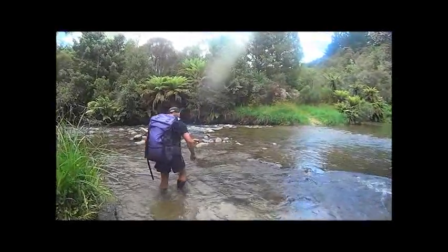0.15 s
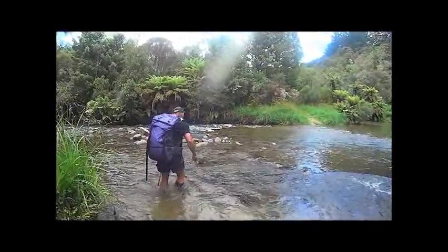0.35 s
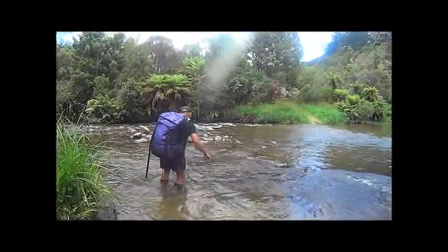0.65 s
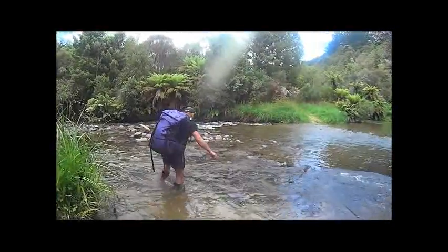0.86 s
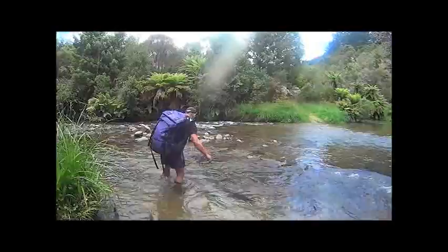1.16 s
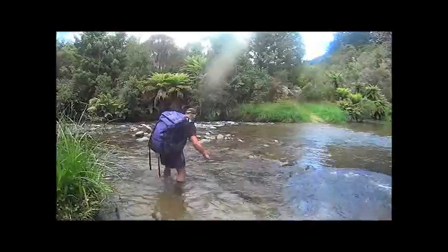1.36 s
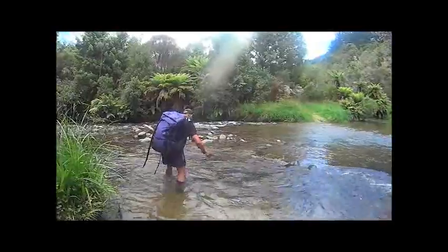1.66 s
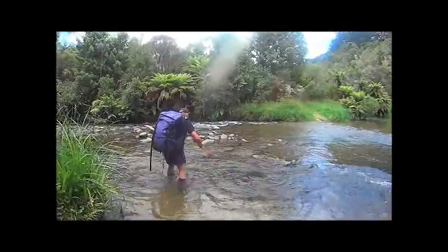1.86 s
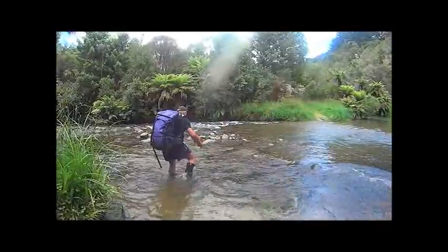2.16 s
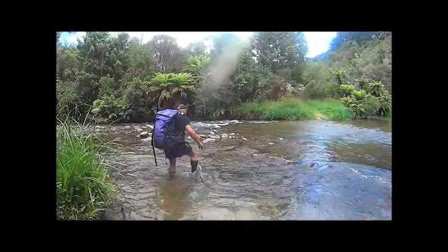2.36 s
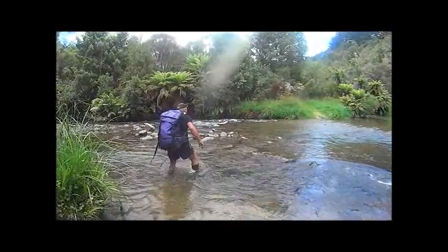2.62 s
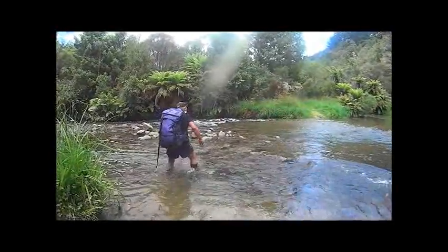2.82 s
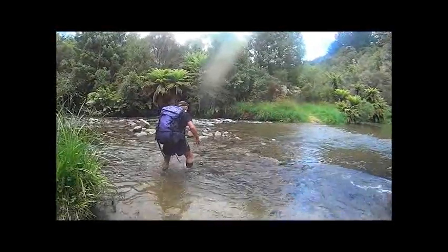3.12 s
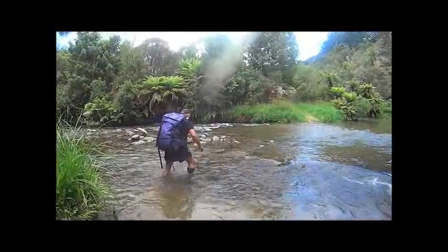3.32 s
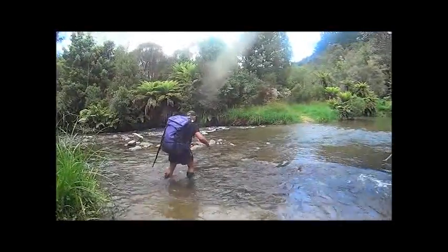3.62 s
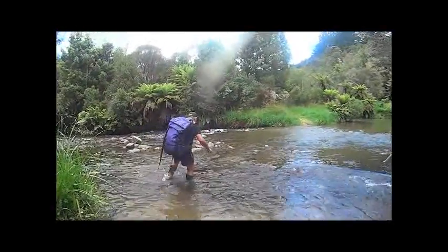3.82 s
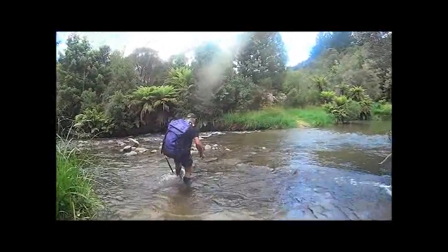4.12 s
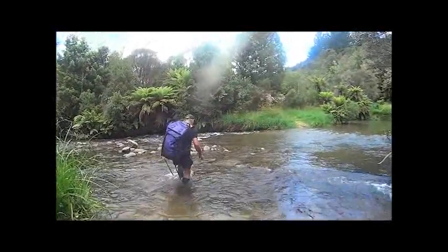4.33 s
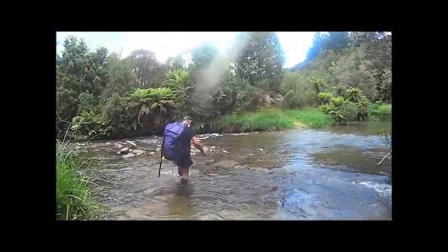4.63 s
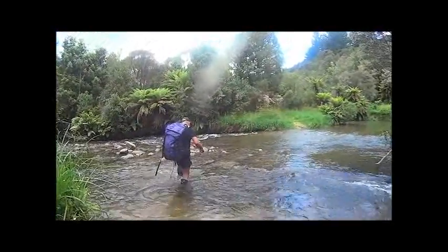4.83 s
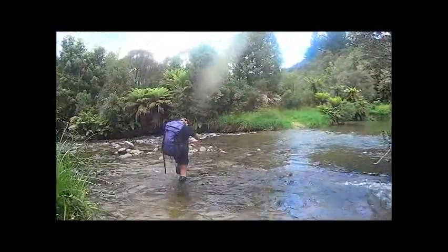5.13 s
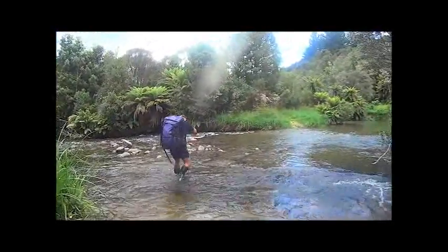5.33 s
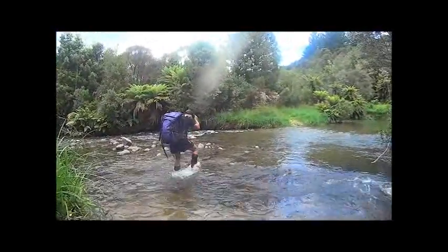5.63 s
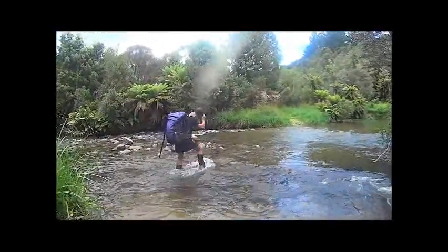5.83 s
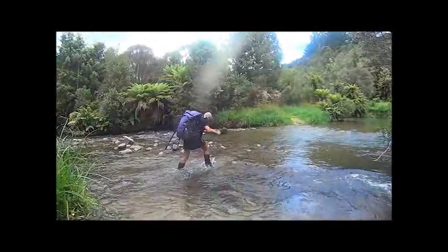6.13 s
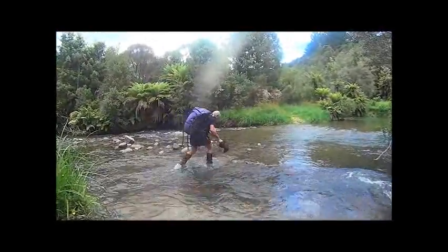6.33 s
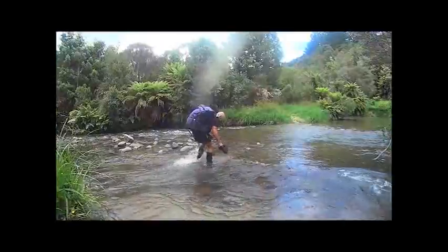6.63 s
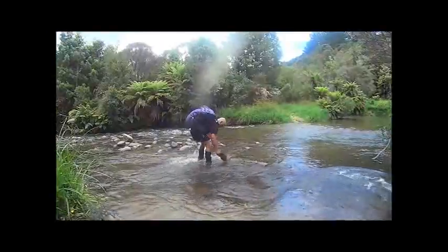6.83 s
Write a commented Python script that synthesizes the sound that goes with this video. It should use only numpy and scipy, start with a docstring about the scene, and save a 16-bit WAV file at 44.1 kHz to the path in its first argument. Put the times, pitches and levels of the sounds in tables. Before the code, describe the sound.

Steady muffled babbling water with a nasal ring, fingers scraping and clacking the camera housing partway through, then faint low wading gurgles.

```python
"""A shallow stream over stones in a forest, on two microphones inside the waterproof housing of a small camera.
Throughout, a far riffle's wash and near bubbles ring the housing's modes and seep through its walls; the babble
swells briefly here and there, and the hand rumbles softly. About 3 s in, the hand grips: fingers scrape and blows
ring the shell. The knocks reseat the case, so the water then rings slightly different modes, louder until it settles.
In the last third a wader's strides add brief low gurgles."""
import sys
import numpy as np
from scipy.fft import rfft, irfft, next_fast_len
from scipy.io import wavfile

SR = 44100
rng = np.random.default_rng(int(sys.argv[2]) if len(sys.argv) > 2 else 0)


def bounce(signal):
    """Save signal as a 16-bit WAV file at the path given by the first command-line argument."""
    frames = np.transpose(np.atleast_2d(signal))
    limited = np.clip(frames, -1, 1)
    pcm = np.round(limited * 32767).astype(np.int16)
    wavfile.write(sys.argv[1], SR, pcm)


N = 307377
T = np.arange(N) / SR  # seconds
SIZE = next_fast_len(N + SR // 2)  # transform length, with room for ringing
HZ = np.maximum(np.arange(SIZE // 2 + 1) * SR / SIZE, 1e-3)  # never 0, for the logarithms

# Housing modes rung by the water; levels relative, before and after the knocks:
# pitch_hz, width_hz, before_db, after_db, left_minus_right_db, phase_between_microphones_rad
HOUSING_MODES = [(151, 320, -28, -28.5, 0.5, 0), (434, 127, -31, -29.5, -4, -1.6),
                 (652, 193, -26, -23.5, 0, -0.9), (1170, 134, -24.5, -23, 3.5, -0.1),
                 (1589.3, 211, -0.6, -2.5, 2, 0.36), (2200, 310, -21.5, -26.5, 3, 0.3),
                 (2620, 510, -18, -17.5, -0.1, 3.0), (2927, 260, -27.5, -18, 5, 3),
                 (3177, 360, -20.5, -18, -1, 1.59), (3560, 520, -25.5, -27, 1.5, 2.27),
                 (4300, 350, -23.5, -25.5, 1.5, 1.8), (5170, 740, -27, -28, 1, -0.5),
                 (7350, 650, -38.5, -33.5, 4.5, 1), (9960, 2100, -40.5, -41.5, 0, -6)]
# Colour of the sound through the walls, unrelated at the two microphones: pitch_hz, relative_level_db (per Hz)
WALL_SEEP = [(40, -16), (150, -9), (270, -1.5), (450, -1.5), (750, .5), (1050, -0.5), (2000, -3),
             (2700, -6.5), (3800, -9.5), (4500, -7), (5300, -8.5), (6300, -10.5), (8500, -12.5),
             (11000, -20)]
# Brief swells of the babble near the main housing resonance: start_s, peak_db (before panning)
SWELL_EVENTS = [(1.475, -39), (2.53, -35), (4.045, -35), (5.461, -39), (6.543, -37.5)]
# Blows on the housing, levels before the shell's antiresonance:
# start_s, click_db, scrape_db, scrape_decay_s, thud_db, hardness_db_per_octave
BLOWS = [(3.050, -52, -39, 0.0067, -68, .3), (3.09, -53, -36, 0.0048, -62, 0),
         (3.096, -49, -32, 0.0038, -53, .3), (3.1126, -44, -26.5, 0.0023, -58, 0.3),
         (3.1414, -18, -25.5, 0.0028, -35, -0.5), (3.226, -32, -35.5, 0.009, -40.5, -.5),
         (3.245, -30, -46.5, 0.017, -65, -1), (3.455, -31, -44, 0.0079, -62, -1.5),
         (3.4921, -23, -33.5, .012, -37, 0.9), (3.535, -21, -29, 0.0067, -37.5, -.7),
         (3.728, -24.5, -42.5, 0.018, -66, 0), (3.7426, -8.5, -33, 0.0026, -44, .6),
         (3.8112, -64, -54, .006, -76, 4.5), (3.931, -55, -54.5, .004, -51, -4.5)]
# Modes of the shell under the hand, levels relative, t60 undamped:
# pitch_hz, t60_s, struck_db, rubbed_db, left_minus_right_db, phase_between_microphones_rad
SHELL_MODES = [(111, 0.01, -40, -5.5, 0, 0), (244, 0.019, -24, -5.5, 3, 0.6), (434, 0.029, -30, 2.5, 0, -2),
               (562, 0.031, -11.5, 3, 1.5, 0.13), (664, 0.23, -27, -29, -7, -2),
               (1250, 0.018, -49, -3.5, -6, 1.4), (1517, 0.023, -2, 4.5, -5, -0.5),
               (1690, 0.01, -8.5, -13, 21, -2), (2290, 0.017, -10.5, -0.5, 0, 1.5),
               (3024, 0.01, -11.5, -5.5, 4.5, 1.34), (3480, 0.03, -29.5, -10, 7, -1),
               (4400, 0.0087, -18.5, -10.5, -3, 0.8), (5060, 0.0068, -36, -7.5, 2, 0.73),
               (6600, 0.0093, -28, -15.5, -1, 4.5), (7720, 0.0088, -20.5, -24, 5, -7.5),
               (9180, 0.003, -16.5, -20.5, -2, 2)]
# Fingers sliding on the housing; the last row is a faint hiss leading into the loudest late knock:
# start_s, length_s, level_db, hardness_db_per_octave
SLIDES_AND_HISS = [(3.043, 0.096, -56.5, 0), (3.148, 0.14, -48.5, 0.6), (3.482, 0.086, -42.5, 0.6),
                   (3.714, 0.031, -50, 2)]
# A wader's legs sloshing in the stream: centre_s, level_db, length_s (standard deviation)
STRIDES = [(4.44, -73, 0.032), (5.677, -61, 0.039), (6.514, -58.5, 0.028)]
# Soft bumps of the hand: start_s, peak_db, pitch_hz
HAND_BUMPS = [(.131, -59, 54.7), (.47, -55, 110), (0.671, -53, 48), (.839, -60, 60), (1.773, -50.5, 80),
              (1.88, -50.5, 105), (2.316, -55, 49.5), (3.49, -42, 85.4), (3.526, -45, 48), (3.99, -54, 60),
              (4.435, -54, 60), (4.87, -56, 110), (5.03, -52.5, 116), (5.73, -60, 44)]
# Colour of the hand's tremor: pitch_hz, relative_level_db (per Hz)
TREMOR_COLOUR = [(10, 1), (25, 8), (65, 2.5), (110, -5), (200, -16), (400, -25), (1000, -58)]

# The knocks reseat the case, gradually
RESEAT_START_S, RESEAT_LENGTH_S = 3.1, 0.5
# Jarred by the later knocks, the case rings a little louder until it settles
SETTLE_START_S, SETTLE_HOLD_S, SETTLE_ATTACK_S, SETTLE_RELEASE_S, SETTLE_DB = 3.48, 0.49, 0.12, 0.15, 1.6
# The longer a slide, the longer it takes to stop
SLIDE_ATTACK_S, SLIDE_RELEASE_SHARE = 0.0099, 0.21
# The hand takes hold once and slowly relaxes
GRIP_START_S, GRIP_HOLD_S, GRIP_ATTACK_S, GRIP_RELEASE_S = 2.99, 0.55, 0.035, 0.34
# Tremor at rest, what the grip adds to it, and how far both wander
TREMOR_DB, GRIP_DB, TREMOR_WANDER_DB = -74.5, -64.5, 1.5
TOP_HZ = 11050  # upper limit of the camera


def stream(ring_db=-26.0, seep_db=-49):
    """The water flows steadily, rings the housing and seeps through its walls."""
    near, *around = (water(bubble_db=-8, spread_db=1.8, flicker_db=.45, count=12000) for _ in range(3))
    jarred = gesture(SETTLE_START_S, SETTLE_HOLD_S, SETTLE_ATTACK_S, SETTLE_RELEASE_S)
    ringing = undb(ring_db + SETTLE_DB * jarred) * housing(near)
    seeping = undb(seep_db) * filtered(np.array(around), colour(WALL_SEEP))
    return ringing + seeping


def water(bubble_db, spread_db, flicker_db, cycles=14, count=7000):
    """An even wash from the far riffle plus nearby bubbles of every size, surging as the water tumbles."""
    wash = rng.standard_normal(N)
    bubbles = np.zeros(N)
    for when, pitch, size, length in rng.random((count, 4)):
        hz = 350 * 30 ** pitch  # 350 to 10500 Hz, even over the octaves
        size_db = -spread_db * np.log(max(size, .01))  # a few are much stronger
        add(bubbles, when * N / SR, undb(size_db) * hz * bubble(hz, cycles * (.5 + length)))
    surge_db = flicker_db * walk(35) + 0.38 * flicker_db * walk(7)
    return unit((wash + undb(bubble_db) * unit(bubbles)) * undb(surge_db))


def bubble(hz, cycles, rise=0.11):
    """A trapped air pocket rings and climbs in pitch as it nears the surface."""
    age = np.linspace(0, 1, int(cycles * SR / hz) + 2)  # share of its life
    turns = hz * T[:len(age)] * (1 + rise * age / 2)
    return np.sin(2 * np.pi * turns) * np.exp(-np.log(100) * age)


def housing(near, sag=0.01):
    """Each mode picks up its own part of the water; the knocks reseat the case, so modes sag and change strength."""
    before = after = 0
    for hz, width, before_db, after_db, pan_db, phase in HOUSING_MODES:
        drive = rfft(np.roll(near, rng.integers(N)), SIZE)
        before = before + resonance(hz, width, pan_db, phase) * (undb(before_db) * drive)
        after = after + resonance(hz * (1 - sag), width, pan_db, phase) * (undb(after_db) * drive)
    reseated = np.clip((T - RESEAT_START_S) / RESEAT_LENGTH_S, 0, 1)
    return (1 - reseated) * irfft(before, SIZE)[:, :N] + reseated * irfft(after, SIZE)[:, :N]


def babble_swells(hz=1560, swell_s=0.0023):
    """The babble swells briefly near the main housing resonance: tones that rise and fade within a few cycles."""
    out, age = np.zeros(N), T[:SR // 20]
    for (s, db), detune in zip(SWELL_EVENTS, rng.standard_normal(len(SWELL_EVENTS))):
        shape = age / swell_s * np.exp(1 - age / swell_s)
        add(out, s, undb(db) * shape * np.sin(2 * np.pi * hz * (1 + 0.029 * detune) * age))
    return pair(1.8, 0).real * out


def knocks(dead_hz=930, dead_width=420):
    """Each blow clicks the shell, jolts the camera and skids a little."""
    blows, friction = np.zeros((2, N)), np.zeros(N)
    for s, click_db, scrape_db, decay_s, thud_db, hardness in BLOWS:
        add(blows, s, undb(click_db) * click(hardness))
        add(blows, s, undb(thud_db) * thud(hz=166, decay_s=0.0025))
        add(friction, s, undb(scrape_db) * np.exp(-T[:SR // 4] / decay_s))
    # between its low and high modes the shell has an antiresonance, where a blow hardly gets through
    detune = (HZ / dead_hz - dead_hz / HZ) * dead_hz / dead_width
    antiresonance = 1j * detune / (1 + 1j * detune)
    return filtered(blows, antiresonance) + scrape(friction, held(BLOWS), grit_db=5)


def click(tilt_db):
    """One strike of the shell, peak 1; a harder contact favours the high modes."""
    age = T[:SR // 8]
    ring = 0
    for hz, t60, db, _, pan_db, phase in SHELL_MODES:
        gain = undb(db + tilt_db * np.log2(hz)) * pair(pan_db, phase)
        decaying_tone = np.exp((2j * np.pi * hz - np.log(1000) / t60) * age)
        ring = ring + (gain * decaying_tone).imag
    ring *= 1 - np.exp(-age / 0.00041)  # the contact takes a moment to build
    return ring / np.abs(ring).max()


def thud(hz, decay_s):
    """The whole camera jolts in a quickly damped swing, peak 1."""
    age = T[:SR // 8]
    swing = np.sin(2 * np.pi * hz * age) * np.exp(-age / decay_s)
    return swing / swing.max()


def slides_and_hiss():
    """Fingers slide grittily over the shell, and a faint hiss leads into the loudest late knock."""
    friction = 0
    for s, length_s, db, _ in SLIDES_AND_HISS:
        friction = friction + undb(db) * gesture(s, length_s, SLIDE_ATTACK_S, SLIDE_RELEASE_SHARE * length_s)
    return scrape(friction, held(SLIDES_AND_HISS), grit_db=5)


def scrape(friction, tilt_db, grit_db, damping=2.78):
    """Stick and slip make tiny uneven catches in the shell, whose modes the fingers damp and widen."""
    grit = np.repeat(rng.uniform(-1, 1, N // 48 + 1), 48)[:N]  # a new catch about every millisecond
    catches = friction * unit(undb(grit_db * grit))
    # tilt_db is per octave: a hard contact favours the high modes, a soft one the low
    out, power = 0, 0
    for hz, t60, _, db, pan_db, phase in SHELL_MODES:
        width = damping * np.log(1000) / (np.pi * t60)
        drive = undb(db + tilt_db * np.log2(hz / 1500)) * catches * rng.standard_normal(N)
        out = out + resonance(hz, width, pan_db, phase) * rfft(drive, SIZE)
        power += undb(db) ** 2 * width / (SR / 2)
    return irfft(out, SIZE)[:, :N] / np.sqrt(power)


def sloshes(hz=650, width=420):
    """Each stride stirs up a brief low gurgle of big bubbles."""
    stir = sum(undb(db) * np.exp(-.5 * ((T - s) / length_s) ** 2) for s, db, length_s in STRIDES)
    gurgle = water(bubble_db=6, spread_db=3, flicker_db=1)
    return stir * unit(filtered(gurgle, resonance(hz, width, 0, 0)))


def rumble(cycles=0.55):
    """The hand's tremor grows with its grip; tremor and soft bumps reach both microphones alike."""
    grip = gesture(GRIP_START_S, GRIP_HOLD_S, GRIP_ATTACK_S, GRIP_RELEASE_S)
    tremor = (undb(TREMOR_DB) + undb(GRIP_DB) * grip) * undb(TREMOR_WANDER_DB * walk(7))
    out = tremor * unit(filtered(rng.standard_normal(N), colour(TREMOR_COLOUR)))
    for s, db, hz in HAND_BUMPS:
        add(out, s, undb(db) * thud(hz, cycles / hz))
    return out


def resonance(hz, width, pan_db, phase):
    """Left and right response of one mode; some modes push the microphones in opposite directions."""
    detune = (HZ / hz - hz / HZ) * hz / width
    return pair(pan_db, phase) / (1 - detune ** 2 + 1j * np.sqrt(2) * detune)


def pair(pan_db, phase):
    """Complex gains with which one resonance reaches the left and right microphone."""
    sides = np.array([[.5], [-.5]])
    return undb(sides * pan_db) * np.exp(1j * sides * phase)


def gesture(start_s, hold_s, attack_s, release_s):
    """Envelope that rises, holds until hold_s after its start and dies away."""
    age = T - start_s
    return np.clip(age / attack_s, 0, 1) * np.exp(-np.maximum(age - hold_s, 0) / release_s)


def held(rows):
    """The last column of an event table, held from each event until the next."""
    table = np.array(rows)
    latest = np.maximum(np.searchsorted(table[:, 0], T) - 1, 0)
    return table[latest, -1]


def walk(rate):
    """Slow chance with a spread near 1, taking a new random value rate times a second."""
    knots = rng.standard_normal(1024)
    return 1.2 * np.interp(T * rate, np.arange(len(knots)), knots)


def colour(points):
    """Gain over frequency from (Hz, dB) points."""
    hz, db = np.transpose(points)
    return undb(np.interp(np.log(HZ), np.log(hz), db))


def filtered(x, response):
    """Pass x through a frequency response."""
    return irfft(rfft(x, SIZE) * response, SIZE)[..., :N]


def add(track, s, sound):
    """Mix a short sound into a track at time s."""
    start = int(s * SR)
    part = track[..., start:start + sound.shape[-1]]
    part += sound[..., :part.shape[-1]]


def undb(db):
    """Decibels to gain."""
    return 10 ** (np.asarray(db) / 20)


def unit(x):
    """Scale to rms 1."""
    return x / np.sqrt(np.mean(x ** 2))


def scene():
    """Water all round, and the hand on the camera."""
    return stream() + babble_swells() + sloshes() + knocks() + slides_and_hiss() + rumble()


def record(dry):
    """The camera cuts off the top octave."""
    return filtered(dry, 1 / np.sqrt(1 + np.minimum(HZ / TOP_HZ, 2) ** 300))  # the limit of 2 avoids overflow


dry = scene()
out = record(dry)
bounce(out)
```